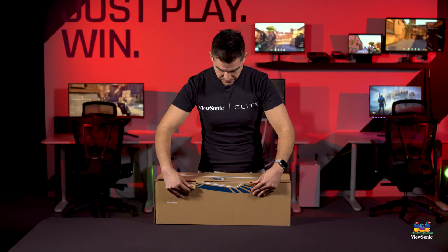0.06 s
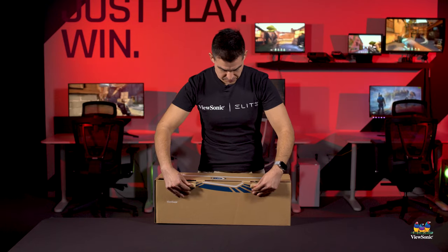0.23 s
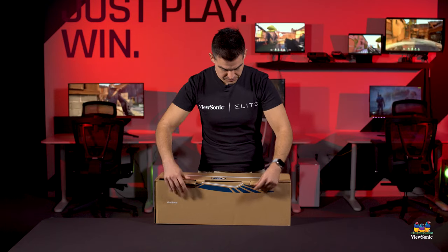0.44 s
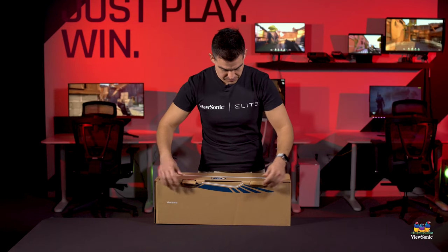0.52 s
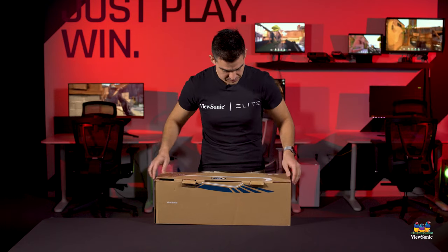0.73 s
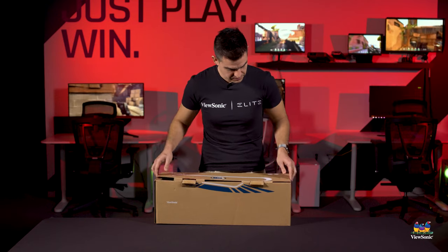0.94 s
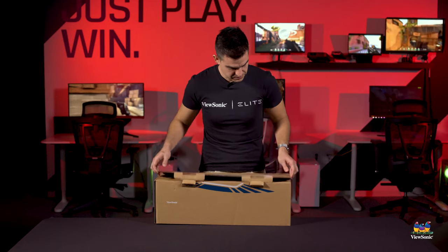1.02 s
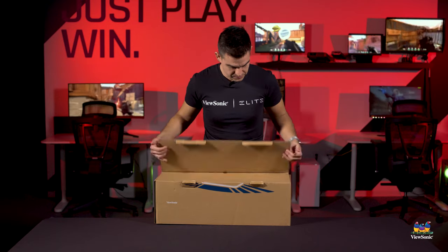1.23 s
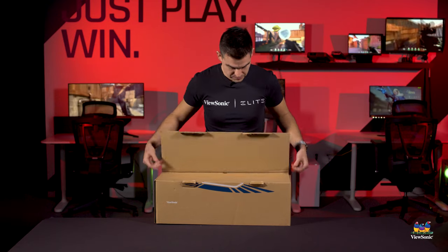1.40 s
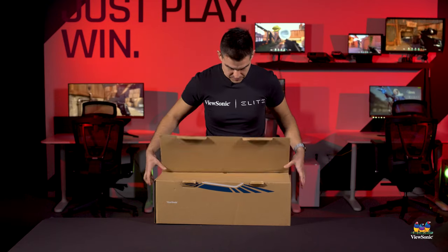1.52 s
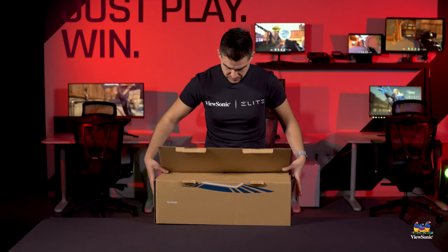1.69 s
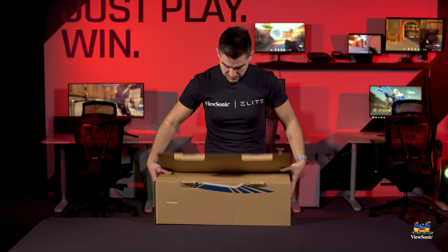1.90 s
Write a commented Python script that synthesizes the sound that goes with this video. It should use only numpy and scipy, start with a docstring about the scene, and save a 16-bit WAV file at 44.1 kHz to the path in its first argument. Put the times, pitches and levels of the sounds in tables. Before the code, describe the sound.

Stiff corrugated card cracks brightly, clicks softly, goes quiet, then rasps and pops with dull hollow thumps as tabs pull free; the first snap returns later, heard closely in a small indoor room.

```python
"""Over a low room rumble with faint hiss, a cardboard flap ticks, then snaps with a bright crack.
Hands work the flap of a corrugated box at a table, close to a mono microphone in a small room.
Cracks are bursts of treble noise; each snap also knocks decaying modes of the box parts.
Scrapes and drags are random grit through filters and modes; thumps are short hums of the enclosed air.
Splices chop some tails short and play one stretch twice."""
import sys
import numpy as np
from scipy import signal
from scipy.fft import rfft, irfft
from scipy.io import wavfile
from scipy.ndimage import uniform_filter1d

SR = 44100
rng = np.random.default_rng(int(sys.argv[2]) if len(sys.argv) > 2 else 0)


def master_out(mix):
    """Clip the mix to full scale and print it as 16-bit PCM to the path in sys.argv[1]."""
    frames = np.transpose(np.atleast_2d(mix))
    ceiling = np.clip(frames, -1, 1)
    pcm = np.round(ceiling * 32767).astype(np.int16)
    wavfile.write(sys.argv[1], SR, pcm)


N = 85995
T = np.arange(N) / SR


def amp(db):
    """Decibel law: a level in dB becomes an amplitude ratio."""
    return 10 ** (np.asarray(db) / 20)


def unit(x):
    """Normalisation: scale to an rms of 1."""
    return x / np.sqrt(np.mean(x ** 2))


def colour(x, points):
    """Spectral shaping: gains follow (Hz, dB) points, -80 dB below the first, held above the last."""
    hz = np.maximum(np.fft.rfftfreq(len(x), 1 / SR), 1)
    point_hz, point_db = np.array(points).T
    gain_db = np.interp(np.log(hz), np.log(point_hz), point_db, left=-80)
    return irfft(rfft(x) * amp(gain_db), len(x))


def band(x, lo_hz, hi_hz):
    """Band-pass filtering: keep the range between two frequencies."""
    edges_hz = [lo_hz, min(hi_hz, .45 * SR)]
    return signal.sosfilt(signal.butter(2, edges_hz, "bandpass", fs=SR, output="sos"), x)


def mode(x, hz, t60):
    """Modal resonance: a two-pole filter whose ring falls 60 dB in t60 seconds."""
    radius = np.exp(-np.log(1000) / (t60 * SR))
    angle = 2 * np.pi * hz / SR
    return signal.lfilter([1, 0, -1], [1, -2 * radius * np.cos(angle), radius * radius], x)


def walk(rate):
    """Random modulation: rate new levels per second, joined by straight slopes, rms 1."""
    step = int(SR / rate)
    held = rng.standard_normal(N)[np.arange(N) // step]
    return unit(uniform_filter1d(held, step))


def fade(t60, size):
    """Exponential decay: the amplitude falls 60 dB in t60 seconds."""
    return np.exp(-np.log(1000) * np.arange(size) / (max(t60, .001) * SR))


# Spectrum of the room rumble and hiss. Each row: frequency in Hz, relative level in dB per Hz.
AIR_SPECTRUM = [(12, -31.5), (20, -9), (114, 0.5), (189, -10.5), (280, -7.5), (452, -12), (670, -9),
                (1650, -26), (1950, -25), (3510, -32), (15100, -40), (16500, -46.5)]
AIR_DB = -59.5  # centre of the wandering level


def air():
    """Broadband background noise: coloured noise whose level wanders by about 1 dB."""
    level = amp(AIR_DB + walk(4.9))
    return level * unit(colour(rng.standard_normal(N), AIR_SPECTRUM))


ROOM_DB, ROOM_T60_S = -14.5, 0.34
ROOM_TREBLE_DB, ROOM_TREBLE_T60_S = -16.5, 0.12  # treble level is relative to the low part of the tail


def room(x):
    """Diffuse reverberation: convolution with a noise tail whose treble dies first."""
    low = band(rng.standard_normal(SR), 150, 4500) * fade(ROOM_T60_S, SR)
    high = band(rng.standard_normal(SR), 1800, 15000) * fade(ROOM_TREBLE_T60_S, SR)
    low = low / np.sqrt(np.sum(low ** 2))
    high = high / np.sqrt(np.sum(high ** 2))
    tail = low + amp(ROOM_TREBLE_DB) * high
    return x + amp(ROOM_DB) * signal.fftconvolve(x, tail[None], axes=1)[:, :N]


# Hollow thumps of the whole box. Each row: centre in seconds, rms level at the centre in dB,
# width of the bell-shaped envelope in seconds (centre to 1/e).
HOLLOW_THUMPS = [(.235, -53, 0.017), (0.489, -59.5, 0.01), (1.079, -42.5, 0.021), (1.2, -47, 0.043),
                 (1.25, -54.5, 0.01), (1.935, -51.5, 0.019)]
HOLLOW_HZ, HOLLOW_WAVER_RAD = 142.4, 0.96


def thumps():
    """Cavity resonance: the air inside the box hums briefly when the walls are pushed."""
    out = 0
    for centre, db, width in HOLLOW_THUMPS:
        swell = np.exp(-((T - centre) / width) ** 2)
        phase = 2 * np.pi * (HOLLOW_HZ * T + rng.random()) + HOLLOW_WAVER_RAD * walk(40)
        out = out + amp(db) * np.sqrt(2) * swell * np.sin(phase)
    return out


GRIT_PER_S, GRIT_SCATTER_DB = 12000, 2.5


def grit():
    """Stick-slip friction: random slips of uneven size."""
    slips = rng.random(N) < GRIT_PER_S / SR
    return slips * rng.standard_normal(N) * amp(GRIT_SCATTER_DB * rng.exponential(size=N))


# Modes of the box, in four lists: big panels, flap, edges, small tabs.
# Each row: frequency in Hz, relative level in dB, decay t60 in seconds.
BOX_MODES = [
    [(276.7, -2, 0.052), (347, 3, 0.058), (420, -1.5, .035), (484.4, -1.5, 0.032), (523.6, -6, .25)],
    [(632, 1, .045), (686, -2, 0.039), (732.8, -3.5, 0.036), (850, 1.5, 0.025)],
    [(1070, 7.5, 0.008), (1264, 2.5, 0.018), (1430, 2.5, 0.014), (1655, -4, .02)],
    [(1980, 2, 0.012), (2318, 5, 0.0057), (2950, -3, 0.0041), (3705, -9, .005)],
]
# A tab drags out of its slot with a swelling pitched rub.
# Each row: start in seconds, end in seconds, rms level at the end in dB.
TAB_DRAGS = [(1.001, 1.062, -51.5)]


def drags():
    """Friction-driven resonance: grit rings the first small-tab mode while the tab is drawn along."""
    hz, _, t60 = BOX_MODES[-1][0]
    rub = unit(mode(grit(), hz, t60))
    out = 0
    for start, end, db in TAB_DRAGS:
        swell = np.sqrt(np.clip((T - start) / (end - start), 0, 1)) * (T < end)
        out = out + amp(db) * rub * swell
    return out


# Scrape levels before flutter. Each row: time in seconds, rasp of the surfaces in dB rms,
# rumble through the panels in dB rms.
SCRAPE_LEVELS = [(0, -73.5, -64.5), (.09, -76, -72.5), (.13, -65.5, -76), (0.191, -67.5, -65.5),
                 (0.207, -53, -58), (0.221, -40, -44.5), (0.238, -34.5, -51), (0.268, -51, -43.5),
                 (.33, -62, -51.5), (.42, -69.5, -56), (.445, -55, -74), (.46, -52, -49), (.475, -54, -63),
                 (0.489, -49, -46.5), (0.519, -62, -65), (.57, -87.5, -78.5), (.82, -81.5, -81.5),
                 (0.882, -67, -65.5), (0.901, -62.5, -55), (0.922, -55, -53.5), (.936, -55.5, -52),
                 (0.959, -60.5, -61.5), (.985, -67.5, -70), (1.02, -50, -54.5), (1.053, -42, -45),
                 (1.074, -38.5, -38.5), (1.094, -49.5, -44), (1.112, -44.5, -40), (1.128, -47, -46),
                 (1.144, -48, -46.5), (1.165, -47, -56), (1.18, -56.5, -55.5), (1.195, -37.5, -44.5),
                 (1.208, -50.5, -56.5), (1.233, -32, -51), (1.253, -44, -49), (1.27, -55.5, -79),
                 (1.686, -52, -45), (1.701, -76.5, -82), (1.745, -73.5, -66), (1.788, -60, -64.5),
                 (1.822, -54, -62), (1.851, -62.5, -74), (1.895, -78, -81), (1.906, -59.5, -57),
                 (1.924, -68.5, -58), (1.95, -67, -81)]
# Spectra of rasp (cracks use it too) and rumble. Each row: frequency in Hz, relative level in dB per Hz.
RASP_SPECTRUM = [(1470, -36), (2500, -9), (4340, -14), (5120, -12.5), (6700, -9), (8100, -5), (11500, -7),
                 (14300, -10), (16100, -24.5), (16500, -40.5)]
RUMBLE_SPECTRUM = [(120, -43.5), (200, -1), (399, -4.5), (506, -6), (675, -0.5), (1260, -4), (1860, -2.5),
                   (2450, -23), (4000, -17), (5200, -46.5), (8800, -120)]
# Edges of the treble ranges that have their own grains. Each entry: frequency in Hz.
GRAIN_EDGES_HZ = [4300, 6000, 8000, 10000, 12500, 17000]
FLUTTER_DB, PATCHY_DB = 1.5, 2.5  # rms level swings of the whole scrape and of each treble range
RUMBLE_RING_DB = -1  # box modes against coloured grit


def scrape():
    """Sliding friction: dense grit rasps in the treble and rumbles through the panels."""
    time, rasp_db, rumble_db = np.array(SCRAPE_LEVELS).T
    flutter = amp(FLUTTER_DB * walk(220))
    coarse = grit()
    fine = 0
    for lo, hi in zip(GRAIN_EDGES_HZ, GRAIN_EDGES_HZ[1:]):
        fine = fine + band(grit(), lo, hi) * amp(PATCHY_DB * walk(90))
    rasp = unit(colour(fine, RASP_SPECTRUM))
    rings = sum(amp(db) * unit(mode(coarse, hz, t60)) for part in BOX_MODES for hz, db, t60 in part)
    rumble = unit(unit(colour(coarse, RUMBLE_SPECTRUM)) + amp(RUMBLE_RING_DB) * unit(rings))
    rasp_gain = amp(np.interp(T, time, rasp_db))
    rumble_gain = amp(np.interp(T, time, rumble_db))
    return flutter * (rasp_gain * rasp + rumble_gain * rumble)


HIT_SIZE = 8192  # samples in one crack or snap
RISE_S, CLICK_DB = 0.00098, 15  # click level is relative to the noise before its decay
RISE = max(int(RISE_S * SR), 1)  # samples
SWELL = np.minimum(np.arange(HIT_SIZE) / RISE, 1)


def crack(peak_db, bright_db, t60):
    """Impulsive radiation: a sharp click inside a short burst of treble noise."""
    burst = rng.standard_normal(HIT_SIZE) * fade(t60, HIT_SIZE) * SWELL ** 2
    burst[RISE] = amp(CLICK_DB)
    lower = band(band(burst, 4090, 7250), 3800, 8700)
    upper = band(band(burst, 7700, 13000), 7400, 11000)
    sound = colour(lower - amp(bright_db) * upper, RASP_SPECTRUM)
    return amp(peak_db) * sound / np.abs(sound).max()


KNOCK_T60_S, BLOOM_T60_S = 0.0042, 0.0093  # decay of the knock and of the filter that softens the onset
RING_SPAN_S = 0.0026  # the ring level is set over this span after the rise
FOCUS_DB_PER_OCT = 61  # loss of modes away from the favoured pitch
DETUNE = 0.011  # random pitch spread as a fraction


def ring(part, near_hz):
    """Modal excitation: a short knock rings one part of the box, most strongly near a favoured pitch."""
    total = 0
    for hz, db, t60 in part:
        knock = rng.standard_normal(HIT_SIZE) * fade(KNOCK_T60_S, HIT_SIZE) * SWELL
        pitch_hz = hz * (1 + DETUNE * rng.standard_normal())
        tone = mode(mode(knock, pitch_hz, BLOOM_T60_S), pitch_hz, t60)
        octaves_off = abs(np.log2(hz / (near_hz or hz)))
        total = total + amp(db - FOCUS_DB_PER_OCT * octaves_off) * tone / np.abs(tone).max()
    return total / total[RISE:RISE + int(RING_SPAN_S * SR)].std()


# Splices between pieces. Each entry: time in seconds.
SPLICE_TIMES_S = [1.2705, 1.6866, 1.9025]
# Small dry ticks of card catching on card. Each row: start in seconds, peak level in dB,
# upper treble against lower in dB before the rasp colouring.
CARD_TICKS = [(0.014, -52, -8), (0.1107, -34.5, 7.5), (0.1847, -50, -14), (0.3315, -40, 0),
              (0.903, -46.5, 8), (.9134, -45, 8), (.9204, -45.5, 4), (0.9284, -33, 0),
              (0.9304, -35.5, 14.5), (0.9402, -35.5, 4.5), (0.944, -41.5, 2), (.9504, -48.5, 8),
              (0.9749, -49, 8.5), (1.7549, -49, 14), (1.7775, -52, 13), (1.8017, -30.5, 15)]
TICK_T60_S = 0.01
# Snaps of the tabs. Each row: start in seconds, crack peak level in dB, upper treble against lower in dB
# before the rasp colouring, crack t60 in seconds, favoured pitches of panel, flap and edge in Hz,
# rings of big panels, flap, edges and small tabs in dB rms.
TAB_SNAPS = [(0.0223, -66, -12, 0.0034, 490, 726, 905, -65.5, -67, -55.5, -60.5),
             (0.1246, -44, -7, 0.024, 388, 690, 1450, -49, -73, -65, -72),
             (0.1898, -62, -5, 0.005, 400, 690, 1100, -63.5, -70, -67, -64),
             (0.2223, -4.5, -1.5, 0.02, 447, 702.5, 1210, -55, -29, -32, -27),
             (0.2314, -14, -11.5, 0.036, 480, 671, 1700, -56.5, -34.5, -45, -56),
             (0.2444, -27, -5, 0.015, 488, 650, 1070, -47.5, -43.5, -39, -36),
             (0.4526, -19, -8, 0.013, 391, 725, 1070, -45, -43, -43.5, -50),
             (0.4761, -25, -2, 0.024, 270, 700, 1030, -43.5, -68, -53, -56),
             (0.4808, -22.5, -6, 0.024, 483, 860, 1160, -37.5, -45, -45, -41.5),
             (0.4945, -35.5, -1.5, 0.011, 424, 850, 1570, -46, -63, -65, -61),
             (0.507, -42, 0, 0.01, 550, 750, 1380, -56, -75, -62, -56),
             (0.8971, -47, 15, 0.012, 317, 680, 1140, -63, -57, -55, -62),
             (1.0563, -22, -3, 0.0097, 396, 680, 1430, -35.5, -38, -25.5, -46),
             (1.0756, -32, -2, 0.018, 346, 620, 1060, -30, -34.5, -27, -36.5),
             (1.0763, -37, -1, 0.017, 295, 710, 1680, -45, -47, -31.5, -55),
             (1.1045, -28.5, 5, 0.016, 352, 810, 1070, -39, -46, -41, -43),
             (1.1153, -35, -1, 0.011, 355, 792, 1380, -45, -48.5, -46, -47),
             (1.135, -27, 5, 0.014, 334, 780, 1100, -44.5, -49, -43, -57),
             (1.1717, -11, 9, 0.016, 420, 820, 1160, -50, -43, -52, -54),
             (1.1842, -18.5, 5, 0.038, 331, 701, 1230, -54, -36.5, -34.5, -66),
             (1.2191, -28.5, 3, 0.025, 480, 744, 1300, -63.5, -57, -51, -51),
             (1.2267, -17.5, 9, 0.015, 431, 755, 1230, -65, -38.5, -40.5, -66),
             (1.2303, -20, -3.5, 0.015, 333, 717, 1215, -56, -40.5, -33, -49),
             (1.2444, -44, 8.5, 0.011, 470, 675, 1040, -56, -42, -40.5, -57),
             (1.9032, -58, 3, 0.022, 404, 710, 1300, -45, -57.5, -52, -71)]


def snaps():
    """Impact excitation: a snap cracks and rings every box part, a tick only cracks; one row per piece."""
    hits = [(s, crack(db, bright_db, TICK_T60_S)) for s, db, bright_db in CARD_TICKS]
    for start, crack_db, bright_db, t60, panel_hz, flap_hz, edge_hz, *ring_db in TAB_SNAPS:
        hit = crack(crack_db, bright_db, t60)
        favoured_hz = (panel_hz, flap_hz, edge_hz, None)  # small tabs favour no pitch
        for part, part_db, near_hz in zip(BOX_MODES, ring_db, favoured_hz):
            hit = hit + amp(part_db) * ring(part, near_hz)
        hits.append((start, hit))
    out = np.zeros((len(SPLICE_TIMES_S) + 1, N + HIT_SIZE))
    for start, hit in hits:
        first = int(start * SR)
        out[np.searchsorted(SPLICE_TIMES_S, start), first:first + HIT_SIZE] += hit
    return out[:, :N]


SPLICE_FADE_S, REPLAY_LAG_S = 0.0018, .62562


def scene():
    """Superposition and splicing: sources add within each piece, and tails stop at the splices."""
    piece = np.searchsorted(SPLICE_TIMES_S, T) == np.arange(len(SPLICE_TIMES_S) + 1)[:, None]
    kept = uniform_filter1d(1. * piece, max(int(SPLICE_FADE_S * SR), 1), axis=1)  # short crossfades
    background = air()
    impacts = snaps()
    sliding = (scrape() + thumps() + drags()) * piece
    pieces = room(impacts + sliding) + background
    pieces[1] = np.roll(pieces[0], round(REPLAY_LAG_S * SR))  # the second piece repeats part of the first
    mono = (pieces * kept).sum(axis=0)
    return np.array([mono, mono])


TOP_HZ = 16000


def record(dry):
    """Band limiting: the recorder cuts the top with a steep low-pass filter."""
    return signal.sosfilt(signal.ellip(8, .2, 70, TOP_HZ, fs=SR, output="sos"), dry)


dry = scene()
out = record(dry)
master_out(out)
```